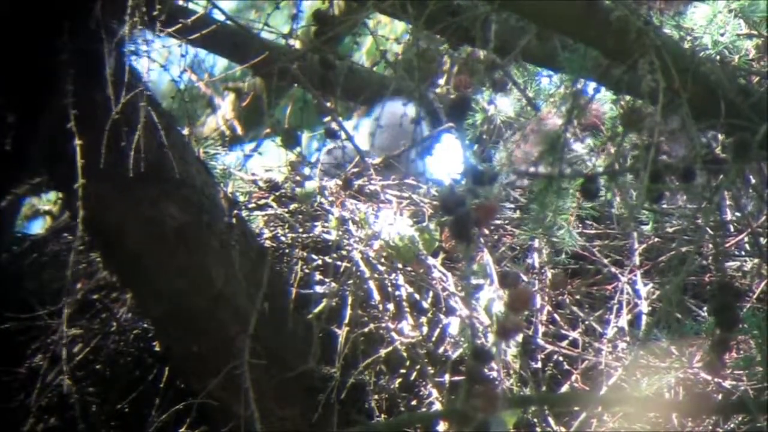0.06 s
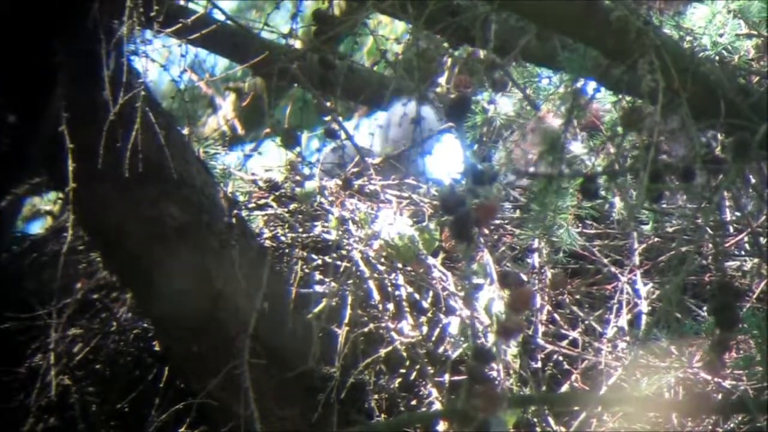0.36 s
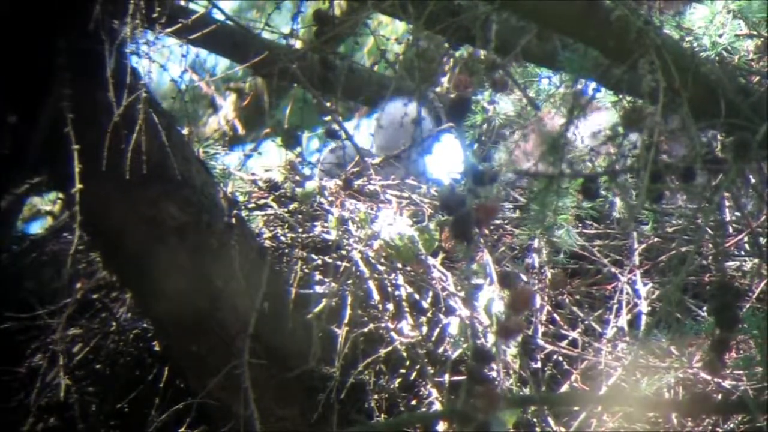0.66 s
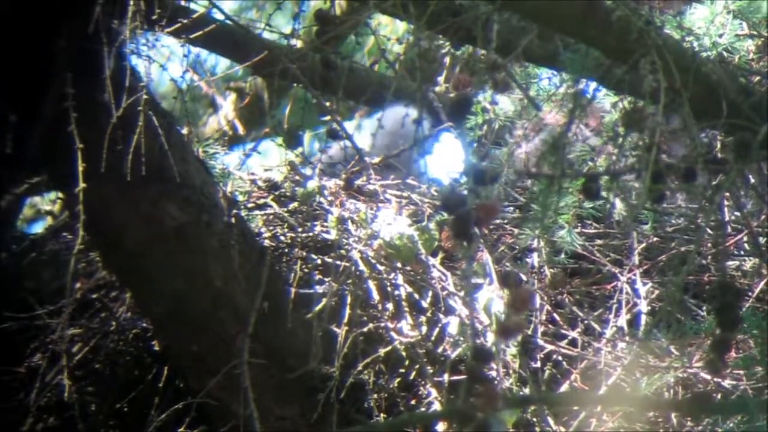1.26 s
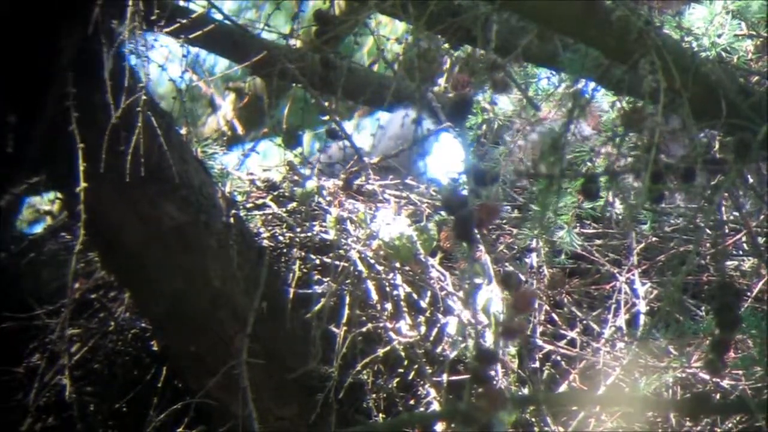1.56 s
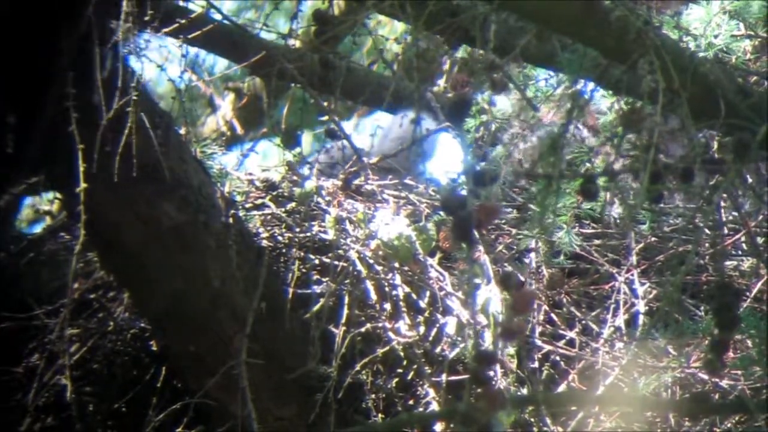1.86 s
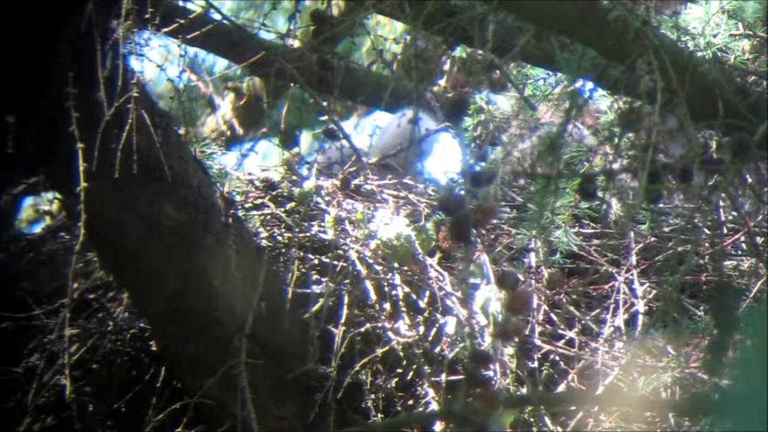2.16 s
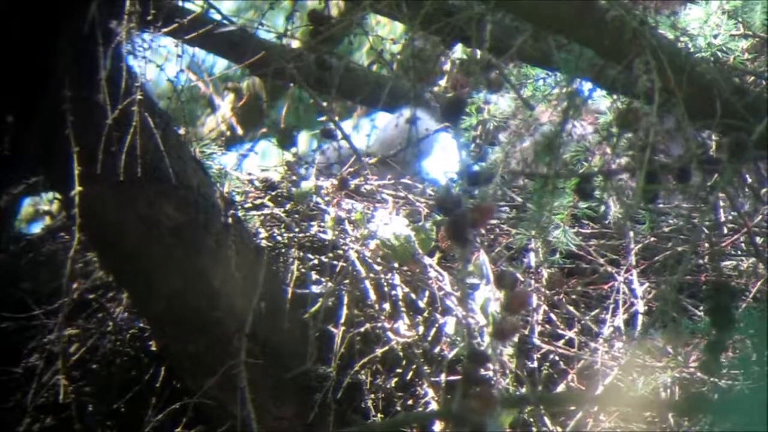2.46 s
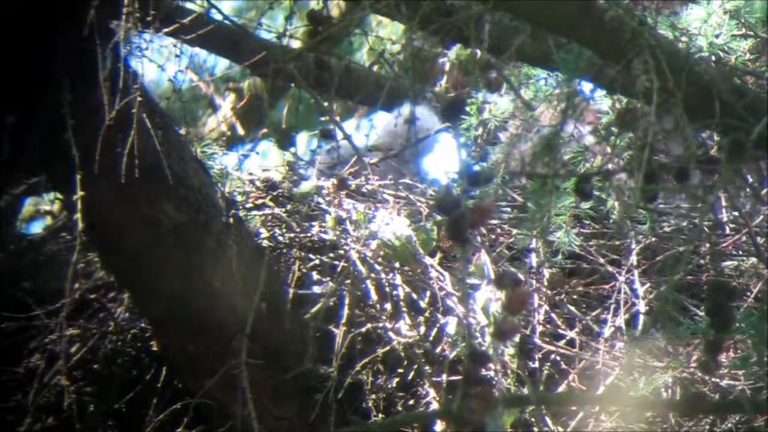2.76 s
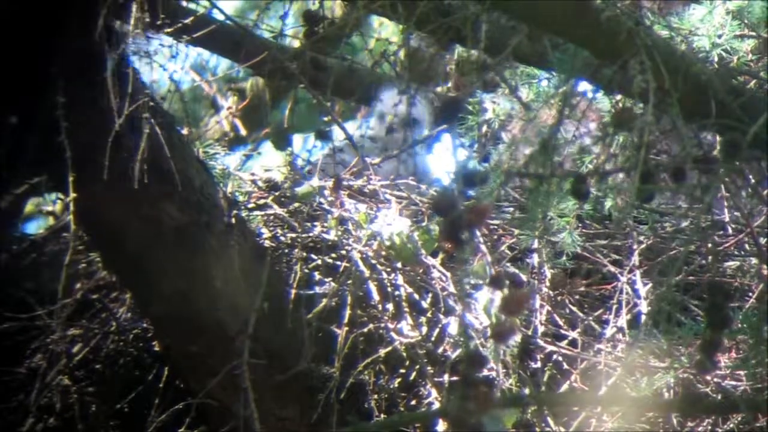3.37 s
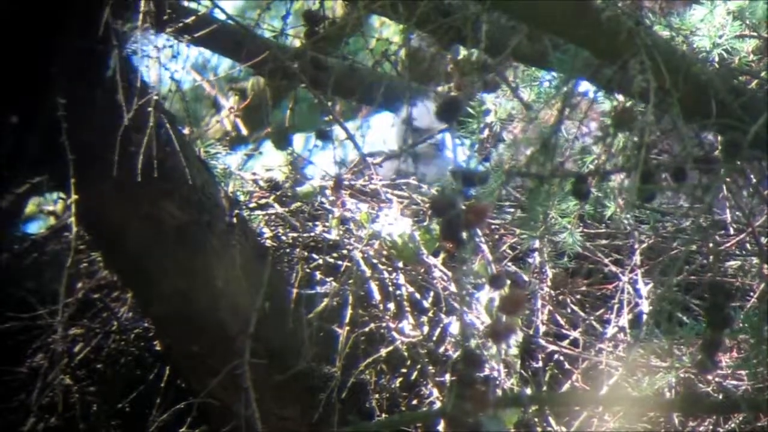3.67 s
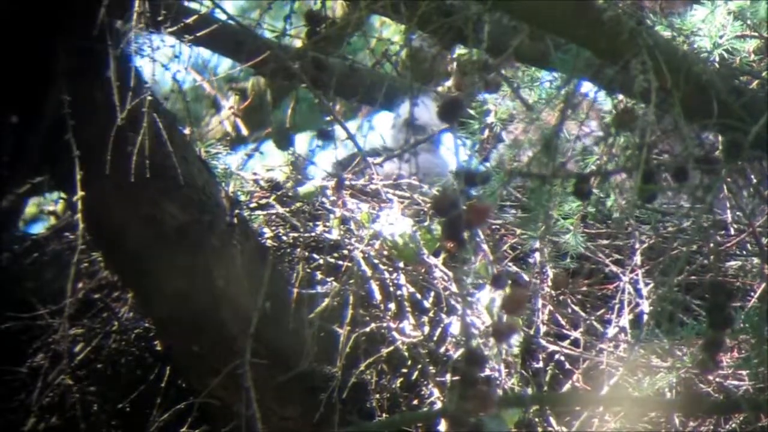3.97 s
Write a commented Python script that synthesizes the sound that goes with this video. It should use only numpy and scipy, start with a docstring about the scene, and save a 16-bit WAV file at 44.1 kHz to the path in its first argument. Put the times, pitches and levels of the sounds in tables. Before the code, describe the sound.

Two drawn-out, falling mews come from a buzzard chick in a conifer wood. A close songbird sings over the first, then small chirps and distant warbling follow, above soft tree hush, low rumble and light wind on the microphone.

```python
"""A conifer wood: a bed of tree hush and low drone, with small puffs of wind on the microphone.
As an earlier whistle rings out, a near songbird opens with slurs, flicks, a warble and a buzz.
Over that phrase a young buzzard mews from its nest, a whistle that leaps up and sinks slowly.
Thin notes and chips follow, the buzzard mews again at 1.7 s, and two tiny ticks pass.
From 2.5 s other birds warble far off. The trunks scatter every call into a tail of echoes."""
import sys
import numpy as np
from scipy import signal
from scipy.fft import rfft, irfft
from scipy.io import wavfile
from scipy.ndimage import uniform_filter1d

SR = 44100
rng = np.random.default_rng(int(sys.argv[2]) if len(sys.argv) > 2 else 0)


def transcribe(signal):
    """Save signal, clipped to [-1, 1], as a 16-bit WAV file at the path in sys.argv[1]."""
    frames = np.atleast_2d(signal).T
    limited = np.clip(frames, -1, 1)
    pcm = np.round(limited * 32767).astype(np.int16)
    wavfile.write(sys.argv[1], SR, pcm)


N = 176400
TIME = np.arange(N) / SR
FREQS = np.maximum(np.arange(N // 2 + 1) * SR / N, 1)


def from_db(db):
    """Decibels to gain."""
    return 10 ** (np.asarray(db) / 20)


def unit_rms(x):
    """Scale to an rms of 1."""
    return x / np.sqrt(np.mean(x ** 2) + 1e-20)


def curve(points):
    """Breakpoints joined up over log frequency."""
    hz, value = np.transpose(points)
    return np.interp(np.log(FREQS), np.log(hz), value)


def band(centre_hz, half_width_hz, order=2):
    """Bell-shaped gain over frequency."""
    return 1 / (1 + ((FREQS - centre_hz) / half_width_hz) ** order)


def drift(rate_hz):
    """Random modulator of rms 1, moving mostly below the given rate."""
    return unit_rms(irfft(rfft(rng.standard_normal(N)) * band(0, rate_hz), N))


def stereo_noise(gain, coherence):
    """Shaped noise of rms 1; the lower the coherence, the wider the image."""
    coherence = np.clip(coherence, -.99, .99)
    mid, side = rfft(rng.standard_normal((2, N))) * gain
    mid, side = mid * np.sqrt(1 + coherence), side * np.sqrt(1 - coherence)
    return unit_rms(irfft(np.array([mid + side, mid - side]), N))


def pan(db):
    """Constant-power gains; positive is left."""
    return unit_rms(from_db(np.array([[db], [-db]]) / 2))


def gate(start, end, attack_s=.003, release_s=.006):
    """Linear attack, hold and release."""
    return np.clip((TIME - start) / attack_s, 0, 1) * np.clip((end - TIME) / release_s, 0, 1)


def cycle(hz):
    """Running phase of a moving pitch."""
    return 2 * np.pi * np.cumsum(hz) / SR


def gesture(rows, fade_s=.0061):
    """Smoothed pitch curve and gain envelope of one call."""
    times, hz, db = np.transpose(rows)
    pitch = uniform_filter1d(np.interp(TIME, times, hz), size=300)
    gain = from_db(np.interp(TIME, times, db)) * gate(times[0], times[-1], fade_s, fade_s)
    return pitch, np.sqrt(2) * gain


# Tone colour of the trees' hush: (frequency [Hz], relative level [dB])
HUSH_SPECTRUM = [(100, -0.5), (250, -1.5), (500, -4.5), (750, -2), (1000, 0.5), (1500, -2.5), (2100, -8),
                 (3000, -10.5), (5500, -18), (7500, -28.5)]
# Stereo image of hush and hiss: (frequency [Hz], left-right coherence [0-1])
BED_COHERENCE = [(100, 0.14), (700, 0.75), (1400, 0.45), (2500, 0.034)]


def hush_and_hiss(crossover_hz=7200):
    """The bed: hush of the trees below the crossover, the microphone's hiss and faint whine above."""
    coherence = curve(BED_COHERENCE)
    low_pass = 1 / np.sqrt(1 + (FREQS / crossover_hz) ** 8)
    high_pass = 1 / np.sqrt(1 + (crossover_hz / FREQS) ** 8)
    hush = from_db(-46) * stereo_noise(from_db(curve(HUSH_SPECTRUM)) * low_pass, coherence)
    hiss = from_db(-63) * stereo_noise(high_pass, coherence)
    whine = from_db(-80.5) * stereo_noise(band(8810, 22), coherence=.99)
    return hush + hiss + whine


# Low end, peaking at 54 Hz: (frequency [Hz], relative level [dB])
DRONE_SPECTRUM = [(20, -13), (42, -9.5), (54, 3.5), (61, -1.5), (68, -5), (90, -12.5), (260, -38)]


def drone():
    """A low, rumbling drone whose level flutters slightly."""
    top_hz = DRONE_SPECTRUM[-1][0]
    rumble = stereo_noise(from_db(curve(DRONE_SPECTRUM)) * band(0, top_hz, order=4), coherence=.78)
    return pan(2) * from_db(-43.5 - .5 * drift(9.9)) * rumble


# The stronger wind bumps: (time [s], level [dB], width [s], pan left [dB])
WIND_BUMPS = [(.621, -23.5, .0017, 39), (.641, -27, 0.0047, 16), (.657, -26.5, 0.0028, 34),
              (.795, -26.5, 0.0028, 25), (1.606, -22, 0.0022, -25), (1.69, -25, 0.0044, 37),
              (2.92, -29.5, 0.0024, 29)]


def wind_puffs(eddies_per_s=5.2, eddy_db=-35.5, eddy_width_s=.0031, eddy_pan_db=16):
    """Each eddy is a soft bump of pressure, mostly on one side of the mic; small ones come at random."""
    draws = rng.random((int(eddies_per_s * N / SR), 2))
    eddies = [(when * N / SR, eddy_db, eddy_width_s * (.5 + size), eddy_pan_db) for when, size in draws]
    out = 0
    for centre, db, width, pan_db in list(WIND_BUMPS) + eddies:
        offset_squared = np.minimum(((TIME - centre) / width) ** 2, 100)
        bump = (1 - offset_squared) * np.exp(-offset_squared / 2)
        out += pan(pan_db) * from_db(db) * bump
    return out


# Tiny clicks in the top end: (time [s], relative level [dB])
TICK_CUES = [(2.018, -47), (2.552, -37)]


def ticks(decay_s=.0014):
    """Very short bursts of bright noise."""
    envelope = 0
    for start, db in TICK_CUES:
        decay = np.exp(-np.minimum(np.abs(TIME - start) / decay_s, 20))
        envelope += from_db(db) * (TIME >= start) * decay
    return envelope * stereo_noise(band(11100, 1500, order=4), coherence=.5) / 2


WOOD_T60_S = .97


def in_wood(dry, wet_db, pan_db=0, echoes_per_s=2500, right_lag_s=.00014):
    """Forest reverb: the direct call plus a dying cloud of echoes from trunks and branches."""
    t = TIME[:SR]
    echoes = rng.standard_normal((2, SR)) * (rng.random((2, SR)) < echoes_per_s / SR)
    onset = np.clip((t - .0041) / .0038, 0, 1)  # pre-delay, then a quick build
    twigs = 1 + 2 * np.exp(-t / .011)  # nearby twigs add strong early reflections
    echoes *= from_db(-60 * t / WOOD_T60_S) * onset * twigs
    echoes /= np.sqrt(np.sum(echoes ** 2, axis=1, keepdims=True))
    tail = signal.fftconvolve(dry[None], echoes, axes=1)[:, :N]
    direct = np.array([dry, np.interp(TIME - right_lag_s, TIME, dry)])  # reaches the left mic first
    wet = from_db(wet_db)
    return pan(pan_db) * (direct + wet * tail) / np.sqrt(1 + wet ** 2)


def dying_echo():
    """The diffuse ring of an earlier whistle fades among the trunks."""
    return from_db(-38 - 60 * TIME / WOOD_T60_S) * stereo_noise(band(3080, 220), coherence=0)


def far_birds(start_s=2.5, centre_hz=3200, spread_octaves=.19, syllables_per_s=11):
    """A distant warble, mostly echo: a fast-wandering pitch chopped into uneven syllables."""
    hz = centre_hz * 2 ** (spread_octaves * drift(30))
    syllables = np.maximum(np.sin(cycle(syllables_per_s * (1 + .5 * drift(10)))), 0)
    song = unit_rms(syllables * np.sin(cycle(hz)))
    entry = np.clip((TIME - start_s) / .003, 0, 1)
    return in_wood(from_db(-58.3) * entry * song, wet_db=1)


SWOOP_TOP_HZ, NOTE_WAVER, NOTE_WAVER_HZ = 7120, .011, 118.5
# Thin chips of small birds: (time [s], length [s], held pitch [Hz], level [dB])
CHIP_CUES = [(0.928, 0.27, 4290, -49), (1.258, 0.052, 5300, -51.5), (1.615, 0.078, 4076, -42.5),
             (1.956, 0.077, 4680, -50.5), (2.266, 0.047, 5340, -53.5), (2.641, .06, 4066, -46),
             (3.051, 0.089, 4620, -52)]


def chips(swoop_s=.025, entry_db=-54.5, fade_db_per_s=18):
    """Each chip swoops in faintly from above, lands on its pitch and fades there."""
    waver = 1 + NOTE_WAVER * drift(NOTE_WAVER_HZ)
    out = 0
    for start, length, held_hz, db in CHIP_CUES:
        swoop = np.clip(1 - (TIME - start) / swoop_s, 0, 1)
        hz = held_hz + (SWOOP_TOP_HZ - held_hz) * swoop ** 2
        fade_db = fade_db_per_s * np.maximum(TIME - start, 0)
        gain = from_db(db + (entry_db - db) * swoop - fade_db) * gate(start, start + length)
        out += gain * np.sin(cycle(hz * waver))
    return in_wood(np.sqrt(2) * out, wet_db=2)


# Plain bird notes: (time [s], length [s], start pitch [Hz], end pitch [Hz], level [dB])
NOTE_CUES = [(0.302, 0.18, 7350, 7650, -65), (0.209, 0.0092, 3650, 5430, -32.5),
             (0.232, 0.016, 3263, 2180, -31), (0.745, 0.039, 3910, 3450, -37),
             (0.768, 0.027, 3600, 2740, -39), (0.797, 0.12, 2095, 2040, -49),
             (1.03, 0.019, 3600, 2970, -37), (1.225, 0.08, 3560, 3640, -47.5),
             (1.301, 0.042, 4500, 3660, -46), (2.032, 0.02, 4700, 4090, -46),
             (2.312, 0.03, 4690, 3570, -47.5), (2.777, 0.025, 4350, 4180, -47),
             (2.82, 0.029, 4200, 3060, -51), (3.109, 0.03, 4550, 3960, -51), (3.283, .075, 4600, 3040, -54),
             (3.499, 0.052, 2860, 4500, -57.5)]


def gliding_notes():
    """Straight whistled glides, mostly falling; nearer, drier and steadier than the chips."""
    waver = np.sqrt(1 + NOTE_WAVER * drift(NOTE_WAVER_HZ))
    out = 0
    for start, length, start_hz, end_hz, db in NOTE_CUES:
        hz = np.interp(TIME, [start, start + length], [start_hz, end_hz])
        out += from_db(db) * gate(start, start + length) * np.sin(cycle(hz * waver))
    return in_wood(np.sqrt(2) * out, wet_db=-4)


# A quick run of sharp flicks: (time [s])
FLICK_CUES = [.065, .094, .134, .161]


def flicks(length_s=.007, end_hz=4100):
    """Each flick is a whistle that dives so fast it reads as a tick."""
    out = 0
    for start in FLICK_CUES:
        end = start + length_s
        hz = np.interp(TIME, [start, end], [SWOOP_TOP_HZ, end_hz])
        out += gate(start, end, attack_s=length_s, release_s=length_s / 10) * np.sin(cycle(hz))
    return in_wood(from_db(-38) * out, wet_db=-4)


def whistle(rows, vibrato_hz=0):
    """The songbird's voice: a pure tone with a slight random waver."""
    hz, gain = gesture(rows)
    return gain * np.sin(cycle(hz * (1 + .008 * drift(200)) + vibrato_hz))


def trill(rows, rate_hz, depth_hz, jitter):
    """A whistle whose pitch swings quickly to and fro at an uneven rate."""
    swing = np.sin(cycle(rate_hz * (1 + jitter * drift(25))))
    return whistle(rows, depth_hz * swing)


# Opening and closing slurs, one list each: (time [s], pitch [Hz], level [dB])
SLUR_CURVES = [
    [(.041, 7320, -33), (.05, 5750, -52.5), (.066, 5370, -46), (.12, 5760, -43.5), (.174, 5870, -44)],
    [(.616, 5800, -41), (.637, 5740, -44), (.651, 3975, -38), (.678, 3740, -53)],
]
# The climbing warble: (time [s], centre pitch [Hz], level [dB])
WARBLE_CURVE = [(.213, 3250, -45.5), (.31, 3470, -39), (.35, 4470, -43.5)]
# The buzz it runs into: (time [s], centre pitch [Hz], level [dB])
BUZZ_CURVE = [(.33, 4650, -48), (.42, 4800, -35.5), (.545, 4740, -34.5), (.565, 4720, -48)]


def songbird():
    """The near phrase: pure slurs on the right frame a warble and a buzz on the left."""
    slurs = sum(whistle(rows) for rows in SLUR_CURVES)
    warble = trill(WARBLE_CURVE, rate_hz=58, depth_hz=272, jitter=.15)
    buzz = trill(BUZZ_CURVE, rate_hz=205, depth_hz=384, jitter=.05)
    return in_wood(slurs, wet_db=-6, pan_db=-5.5) + in_wood(warble + buzz, wet_db=.5, pan_db=6)


# The buzzard's two mews, one list each: (time [s], pitch [Hz], level [dB])
MEW_CURVES = [
    [(.168, 1897, -59), (.195, 2595, -30.5), (.225, 2720, -43), (.28, 2455, -35.5), (.34, 2230, -42.5),
     (.40, 2134, -44), (.52, 1874, -50.5), (.60, 1827, -54)],
    [(1.665, 1980, -41.5), (1.696, 2630, -42), (1.725, 2803, -37.5), (1.78, 2607, -37), (1.844, 2385, -40),
     (1.902, 2143, -42.5), (2.0, 2010, -47), (2.15, 1898, -48.5)],
]


def buzzard(waver=.015, octave_db=-25):
    """The lead voice: a slightly unsteady whistle with a weak octave on top."""
    out = 0
    for rows in MEW_CURVES:
        hz, gain = gesture(rows)
        phase = cycle(hz * (1 + waver * drift(110)))
        out += gain * (np.sin(phase) + from_db(octave_db) * np.sin(2 * phase))
    return in_wood(out, wet_db=-3)


def scene():
    """The mix, from the bed up to the buzzard."""
    ambience = hush_and_hiss() + drone() + wind_puffs() + ticks() + dying_echo()
    small_birds = far_birds() + chips() + gliding_notes() + flicks()
    return ambience + small_birds + songbird() + buzzard()


def record(dry):
    """The recorder cuts a narrow notch in the treble and rolls the top off steeply."""
    notch = signal.butter(6, (7750, 8720), "bandstop", fs=SR, output="sos")
    high_cut = signal.ellip(10, .2, 70, 15200, fs=SR, output="sos")
    return signal.sosfilt(high_cut, signal.sosfilt(notch, dry))


dry = scene()
out = record(dry)
transcribe(out)
```